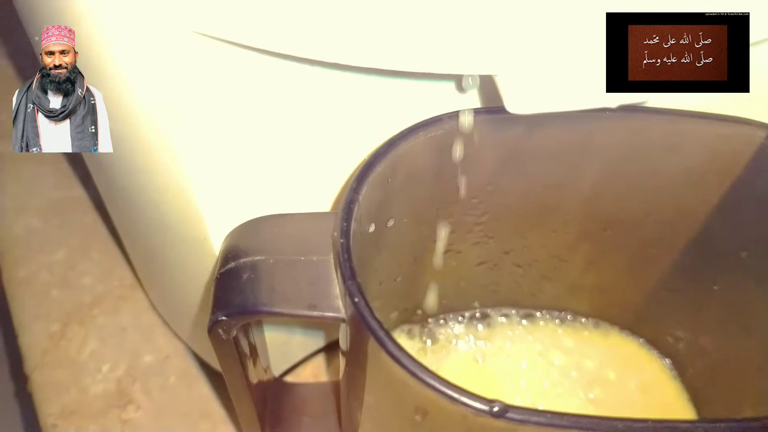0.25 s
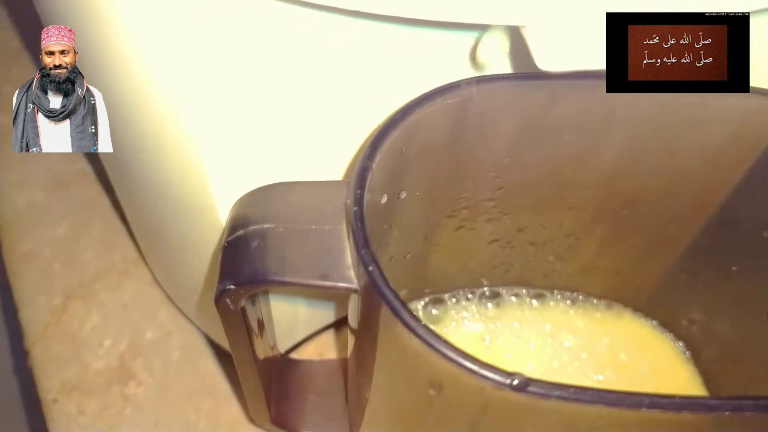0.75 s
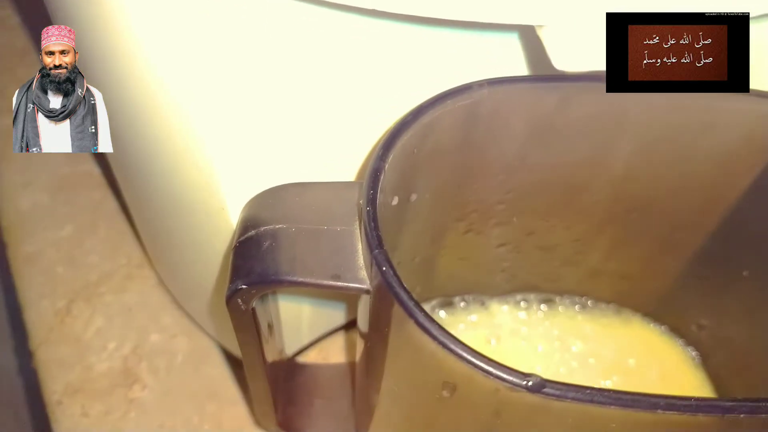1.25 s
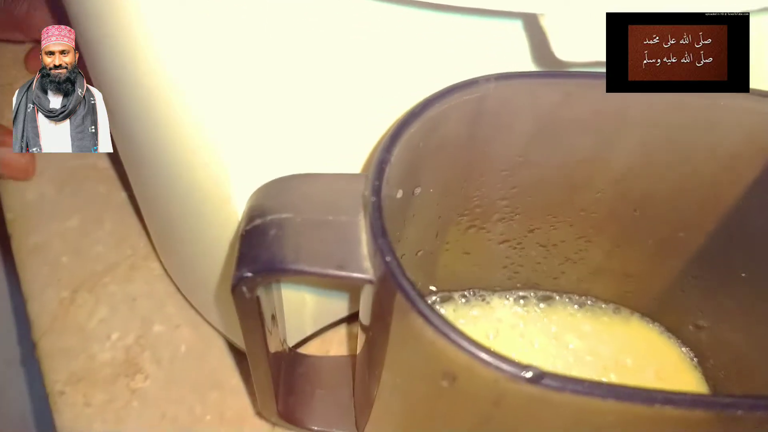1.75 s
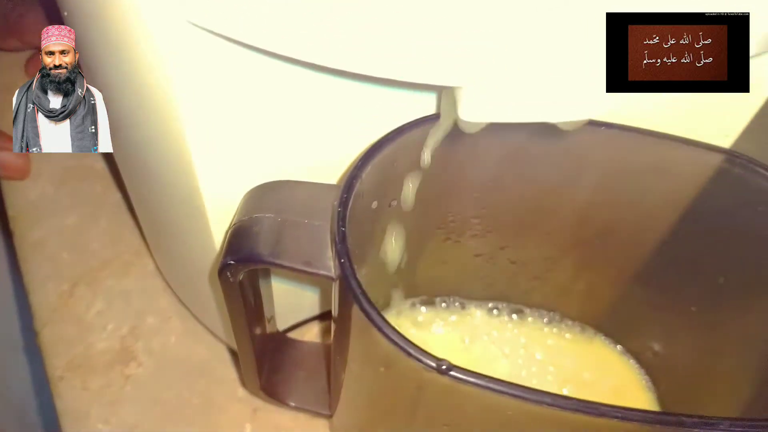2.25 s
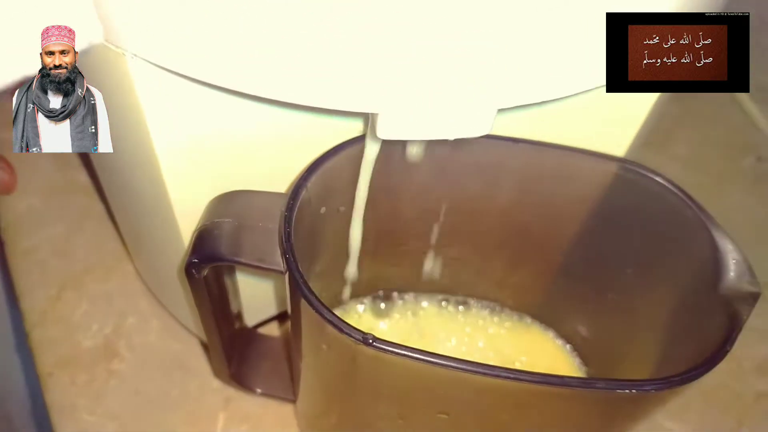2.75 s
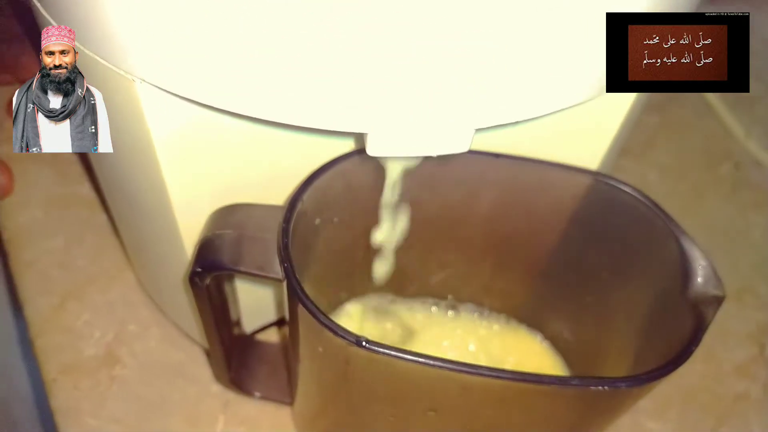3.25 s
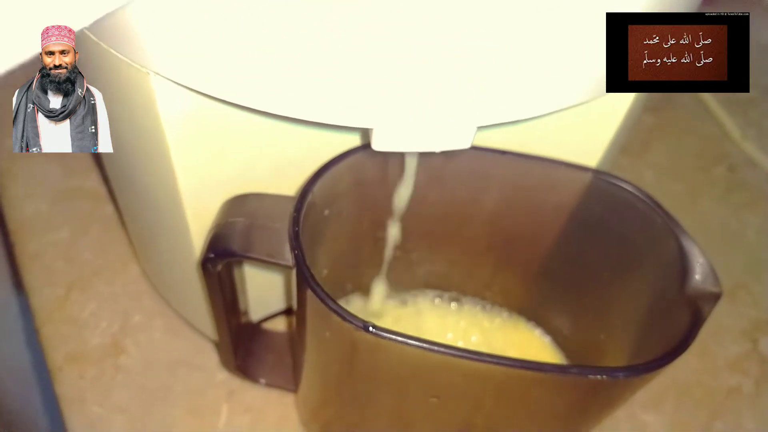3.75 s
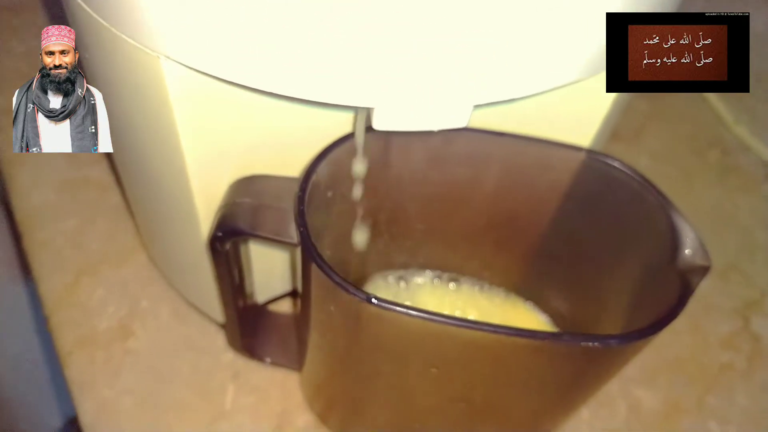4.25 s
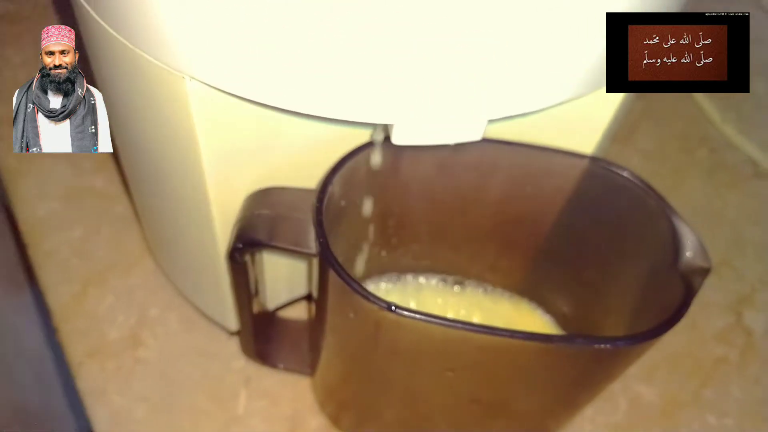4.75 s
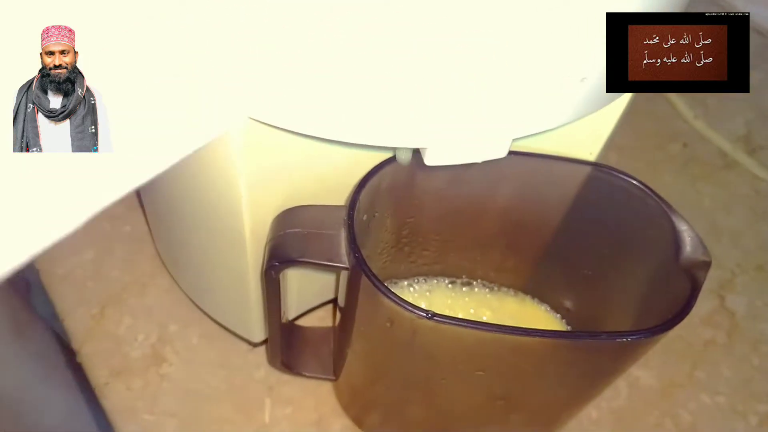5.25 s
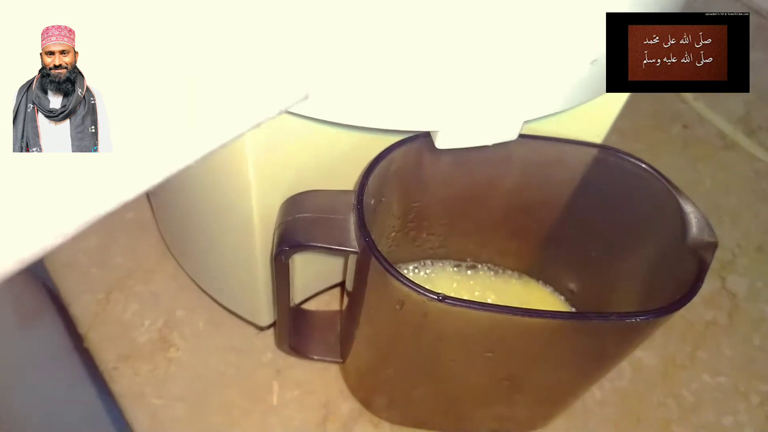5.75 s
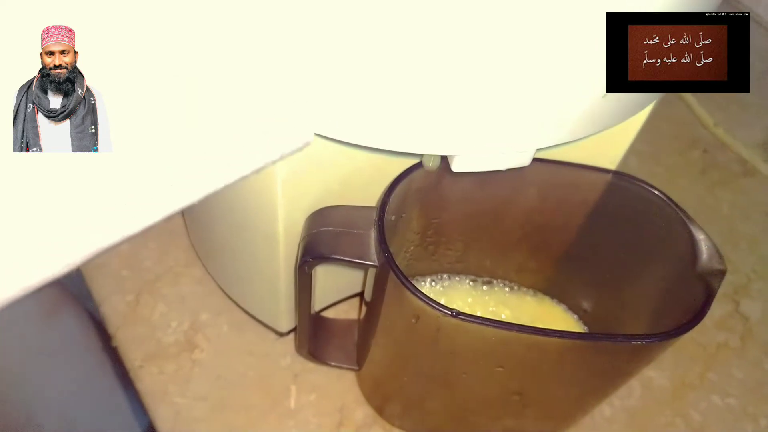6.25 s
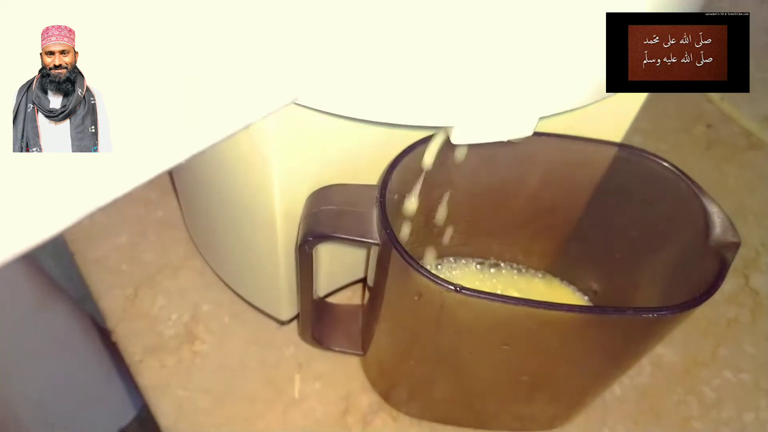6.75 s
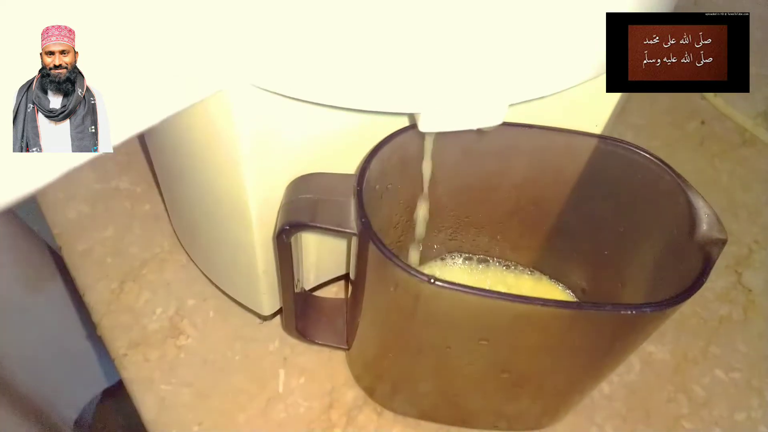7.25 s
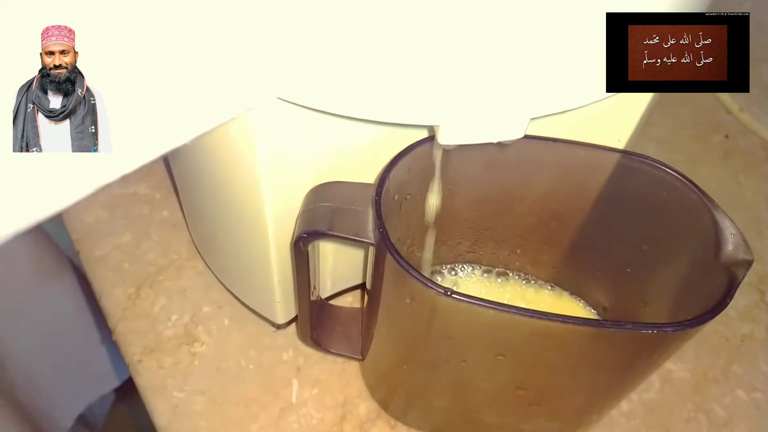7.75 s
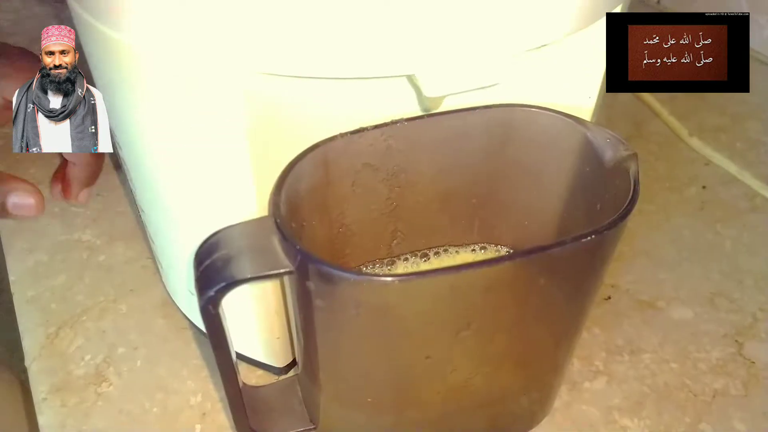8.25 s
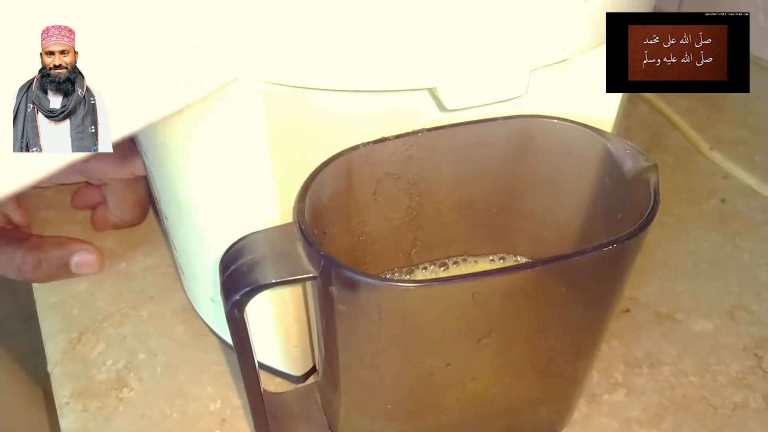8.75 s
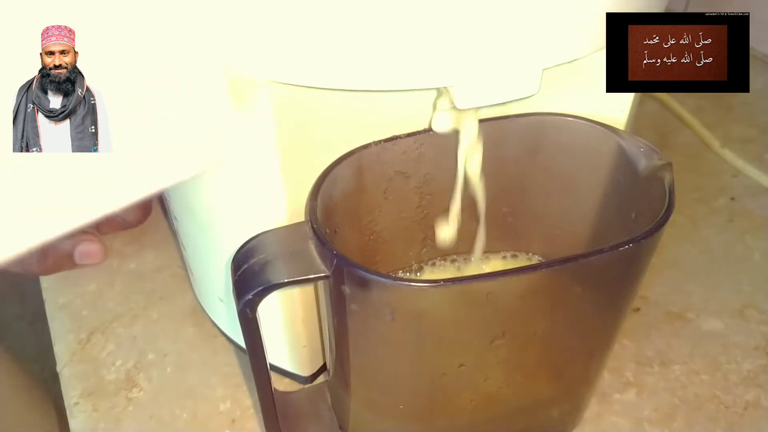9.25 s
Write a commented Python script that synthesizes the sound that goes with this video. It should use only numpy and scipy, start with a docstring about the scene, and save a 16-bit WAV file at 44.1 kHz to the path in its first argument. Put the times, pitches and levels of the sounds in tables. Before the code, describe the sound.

Very close to a juicer on a stone counter, a fast rattling knock and low motor hum slow gradually. A hard plastic clack drops the level, smaller clacks follow, then the motor surges high with loud wet grating and falls. It coasts downward, clacks and quiets again near five seconds, rises, sags, dips once more amid a cluster of clacks, and ends with a rising, harsh scraping surge.

```python
"""Fast knocking under a wet hiss is heard first: the unbalanced basket of a centrifugal juicer strikes its
plastic housing once a turn while fruit hisses on the grater. Motor pushes raise the speed, fruit brakes it,
and between them the basket coasts. Commutator bars whine at multiples of the speed, unbalance hums in the
stone counter, loose panels resonate, the grater scrapes in a broad band near 3 kHz, and pusher, lid and
switch clack as struck plastic. Two close ports."""
import sys
import numpy as np
from scipy import signal
from scipy.fft import rfft, irfft
from scipy.io import wavfile
from scipy.ndimage import uniform_filter1d, map_coordinates

SR = 44100
rng = np.random.default_rng(int(sys.argv[2]) if len(sys.argv) > 2 else 0)


def output_pcm(signal):
    """Save a mono or channel-first signal as 16-bit PCM at the path in sys.argv[1].

    Samples are clipped to [-1, 1] before scaling.
    """
    pcm = np.clip(np.atleast_2d(signal).T, -1, 1) * 32767
    wavfile.write(sys.argv[1], SR, np.round(pcm).astype(np.int16))


N = 419832

# motion of the basket: air drag grows with speed, bearing friction does not
START_TURNS, DRAG_PER_S, FRICTION = 76.3, .23, 6.9  # turns per s, 1 per s, turns per s2
# motor pushes and fruit brakes: (start [s], end [s], speed reached [turns/s], whine while coasting after [dB])
SPEED_CHANGES = [(1.76, 2.3, 130.5, -85), (2.32, 2.69, 74.7, -55), (3.38, 3.5, 80.8, -59),
                 (6.23, 6.71, 91.8, -59), (8.78, 9.13, 98.5, -85), (9.34, 9.6, 117, -85)]
# after a hard clack the turns go unheard for a while: (from [s], until [s])
LULLS = [(1.245, 1.8), (5.12, 6.66), (8.26, 8.86)]
LULL_EDGE_S, LULL_STEADY = .08, .04  # fade beside a lull; share of the rumble added to repeat even within it
# fruit meets the grater: (start [s], full [s], held until [s], gone [s], grating gain [dB], spray gain [dB],
# growth while held [dB]); a start later than full brings the feed in with a step
FEEDS = [(-.1, -0.5, 0.025, 0.42, 2.5, 2, 2.5), (0.83, 0.5, 1.04, 1.3, -1.5, 2.5, -0.5),
         (1.777, 1.46, 1.74, 1.87, 15.5, 0, 1), (1.88, 1.77, 2.27, 3.16, 10, 7, 4),
         (2.3, 2.5, 2.57, 2.9, 12.5, 15, -1), (3.424, 3.5, 3.58, 3.35, 10, 8.5, 3),
         (4.03, 4.06, 4.27, 3.2, -1.5, -6, -3), (4.38, 3.5, 5.5, 7.6, 3, 4, -4),
         (5.33, 5.5, 6.25, 5.95, 12.5, 6.5, -23), (6.34, 6.5, 6.66, 6.73, 9, 10, 7.5),
         (8.115, 8.5, 6.6, 8.6, 10, 14, -5), (8.58, 8.5, 9.3, 10.3, 7.5, 8.5, 7),
         (9.05, 10, 12, 7.8, 16.5, 16.5, 5), (9.443, 8.5, 9.4, 9.7, 21.5, 7.5, -0.5)]
QUICKEST_S = .04  # the grater never empties faster

# the knocking of one turn
# what repeats each turn: (time [s], share of rumble [0-1], share of grating [0-1], treble chatter [dB])
REPEATS = [(0, .82, .5, -62), (.55, .8, .35, -57), (.8, .65, .4, -54), (1.2, .6, .5, -53),
           (1.8, .22, .1, -62), (2.22, .3, .1, -60), (2.32, .55, .15, -60), (2.45, .5, .1, -60),
           (2.55, .18, .1, -62), (2.8, .45, .25, -64), (3.3, .5, .3, -66), (3.45, .35, .1, -66),
           (3.62, .75, .5, -62), (3.9, .72, .4, -60), (4.05, .58, .15, -58), (4.6, .42, .2, -57),
           (4.8, .42, .55, -55), (5.1, .42, .55, -54), (6.7, .35, .1, -68), (7.2, .55, .25, -66),
           (7.8, .68, .35, -61), (8.2, .72, .4, -58), (8.9, .3, .1, -65), (9.52, .4, .1, -65)]
# spectrum of the treble chatter: (frequency [Hz], level per hertz [dB])
CHATTER_SPECTRUM = [(3800, -40), (4700, -3), (5400, 3), (6200, -10), (6800, -9), (7500, 2), (8200, -6),
                    (9500, -25)]
TOP_ORDER, LOW_ORDERS = 165, 18  # highest order of the speed; orders below the second scatter more
SMEAR_LOW, SMEAR_HIGH = .45, .16  # phase scatter in turns: high orders line up into a tick

# rumble and hum: (time [s], housing rumble [dB], counter hum [dB])
LEVELS = [(0, -20, -25), (.42, -24.5, -27), (.7, -22, -29), (.74, -24, -26.5), (1.1, -24, -23.5),
          (1.235, -22.5, -26.5), (1.3, -38.5, -42), (1.5, -39, -40.5), (1.64, -31.5, -32.5),
          (1.75, -40, -32), (1.81, -24.5, -29), (1.9, -17, -26), (2.4, -19.5, -25.5), (2.68, -25, -32.5),
          (2.83, -35, -36.5), (3.1, -31, -30.5), (3.36, -31.5, -27.5), (3.43, -20.5, -25),
          (3.65, -25.5, -23), (4.05, -20.5, -25), (4.45, -24.5, -27.5), (5.11, -29.5, -25.5),
          (5.19, -35, -47), (5.31, -42, -44.5), (5.37, -30.5, -38), (5.47, -24.5, -37), (5.54, -28, -36.5),
          (5.74, -27.5, -33), (5.78, -35.5, -38), (5.87, -31, -35.5), (5.92, -36.5, -46),
          (6.02, -44.5, -43.5), (6.21, -54.5, -45.5), (6.26, -50, -46), (6.285, -36.5, -40),
          (6.34, -31.5, -37.5), (6.7, -24.5, -31.5), (6.9, -22, -25), (7.3, -24, -22), (7.66, -21.5, -28.5),
          (8.1, -24, -23), (8.2, -30.5, -33), (8.3, -31.5, -41), (8.35, -37.5, -46), (8.42, -40, -54),
          (8.47, -34.5, -39.5), (8.85, -23.5, -36), (8.98, -24, -25.5), (9.52, -21.5, -27.5)]
# spectrum of the housing: (frequency [Hz], level per hertz [dB])
HOUSING_SPECTRUM = [(200, -42), (330, -6.5), (500, 0), (720, -3.5), (1000, -7), (1200, -11), (1450, -21),
                    (1680, -8.5), (1950, -21), (2300, -9.5), (2800, -25.5), (4000, -112)]
# tilt of the housing's colour: (time [s], tilt [dB per octave])
BRIGHTNESS = [(0, -1.5), (.35, 0.5), (1.2, -3.5), (1.7, 3.5), (1.85, -4.5), (1.96, 5), (2.4, 6.5),
              (2.75, -0.5), (3.0, -1), (3.4, 0.5), (3.53, 4), (4.0, 0.5), (4.43, -0.5), (4.58, -4),
              (5.1, -2), (5.2, 4), (5.55, 4), (5.8, 0), (6.25, 1), (6.6, 4), (7.3, 2), (7.66, -1),
              (8.2, -2), (8.4, 2), (8.68, -3), (9.05, 3.5), (9.52, 2.5)]
# spectrum of the counter's shudder: (frequency [Hz], level per hertz [dB])
COUNTER_SPECTRUM = [(25, -37), (40, -7), (65, -58), (90, -4.5), (110, -1), (160, 7.5), (220, 6), (300, 0.5),
                    (420, -43.5)]
# how the counter answers a shake: (frequency [Hz], level [dB])
COUNTER_RESPONSE = [(45, -70), (65, -64), (80, -51), (100, -45.5), (120, -43), (140, -27.5), (160, -26),
                    (200, -29.5), (260, -30.5), (400, -29.5)]
# first, second and third order of the speed: level added to the counter's answer [dB]
UNBALANCE_DB = [5.5, 0.5, -3]
# how lopsided the pulp lies in the basket: (time [s], first order [dB], higher orders [dB])
PULP = [(0, 2, 0), (.5, -10, -2.5), (1.2, 5, 2), (1.9, 8, -2.5), (2.3, -0.5, -2), (2.7, 9, -8.5),
        (3.3, 6, -1.5), (3.6, 1, -5), (4.3, 1, -0.5), (5.1, 2, -7), (6.7, 1, -1.5), (7.2, 5.5, -3.5),
        (8.2, -6, -1), (8.9, -15, 2), (9.2, 1.5, -2.5), (9.52, 2.5, 0)]
SHAKE_FOLLOWS = 0.95  # dB of the orders per dB of hum
# loose panels resonate, and the grater scrapes in a broad band near 3 kHz:
# (start [s], end [s], frequency [Hz], width [Hz], level [dB])
RESONANCES = [(0.199, 0.786, 706, 39.4, -24), (1.797, 2.266, 575, 89, -26), (1.94, 2.284, 740, 60, -30),
              (3.415, 3.482, 1680, 90, -28.5), (3.432, 3.567, 1100, 70, -25.5),
              (4.05, 4.453, 1134, 80, -32.5), (4.037, 4.29, 3200, 496, -48), (4.11, 4.286, 1650, 179, -35),
              (8.699, 9.296, 3160, 590, -38.5), (9.019, 9.19, 3130, 600, -29),
              (9.203, 9.52, 3200, 600, -36), (9.341, 9.47, 3080, 700, -28), (4.56, 4.993, 730, 58.7, -32.5),
              (4.6, 5.127, 502, 69, -29.5), (5.451, 5.76, 514, 49.7, -43), (6.622, 6.894, 720, 50, -30.5),
              (7.477, 7.514, 705, 88, -32), (7.545, 8.096, 660, 87.5, -36), (8.996, 9.363, 765, 40.6, -24),
              (9.373, 9.47, 627, 60, -23.5), (9.358, 9.484, 920, 120, -22.5)]

# lines of the whine: (multiple of the speed [1], level [dB])
BAR_LINES = [(36, -6), (60, -15), (72, 0), (84, -14), (96, -15), (108, -19), (120, -17), (144, -17)]
# the whine swells and sinks: (time [s], level [dB])
WHINE_SWELL = [(0, 4), (.3, 3), (.8, 2), (1.0, -3), (1.3, -6), (2.7, 5), (2.95, 2), (3.15, -4), (3.6, 1),
               (3.9, 2), (4.15, -3), (4.5, -2), (4.85, 2), (5.1, 5), (6.9, -7), (7.05, 4), (7.7, 4),
               (8.1, 2)]
# how the housing lets the whine out: (frequency [Hz], gain [dB])
WHINE_BODY = [(1500, -18), (2700, -13), (3300, 8), (3900, 2), (4600, -4), (5600, 2), (6500, -2), (7800, 2),
              (10000, -10)]
# dB; dB per dB of rumble and hum; dB lost per dB of grating
START_WHINE_DB, WHINE_FOLLOWS, WHINE_MASKED = -58, .5, .8

# spectrum of the grating: (frequency [Hz], level per hertz [dB])
GRATER_SPECTRUM = [(800, -19.5), (1450, -4), (1680, -5), (1950, -21), (2300, 0), (2800, -1.5), (3300, -8),
                   (3800, -17), (5000, -48)]
# spectrum of the spray: (frequency [Hz], level per hertz [dB])
SPRAY_SPECTRUM = [(2800, -7), (3800, -14.5), (4500, 2.5), (5400, 2), (6300, -0.5), (7500, -2.5), (9000, -8),
                  (11000, -12.5), (15000, -21)]
# pulp stuck to the grater scrapes once a turn: (time [s], depth of the hiss's throb [0-1])
THROB = [(0, .5), (.6, .4), (.9, .1), (2.0, .25), (3.3, .2), (3.6, .45), (4.0, .3), (4.05, .85),
         (4.28, .85), (4.33, .15), (5.1, .15), (6.75, .35), (7.0, .6), (7.55, .65), (7.75, .3), (8.2, .2),
         (9.52, .15)]
GRATING_DB, SPRAY_DB, HISS_FOLLOWS = -41.5, -49, 0.74  # with rumble and hum at -20 dB; dB per dB of them
TOP_HZ, TOP_DB, TOP_PER_DB = 10200, -5, 0.5  # the hiss above 10.2 kHz is duller when quiet, brighter when loud

# pusher, lid and switch: (time [s], level [dB], treble of the tick against the ring [dB],
# pitch of the lower modes [factor], upper modes [dB], hardness of the first touch [1])
CLACKS = [(1.177, -12, -30, 0.63, -4, 1.2), (1.243, 3, -21.5, 1.09, -4, 2.9),
          (1.249, -13, -16, 1.1, 7, 1.4), (1.265, -24, -25, 0.89, 0, 1.2),
          (1.454, -20.5, -29, 0.69, -4, 2.5), (1.515, -10, -37, 1.33, -3, 1.06),
          (1.527, -19, -30, 1, -8, .5), (1.546, -31, -30, 1, -4, .5), (1.582, -17, -33, 0.77, -10, 1),
          (1.588, -21, -30, .8, -6, .5), (1.598, -12, -20, .8, 2, 1), (1.6035, -11.5, -15, 1.04, -5, 1),
          (1.6095, -9, -18, 1.07, -6, 0.45), (1.617, -21, -20, .8, 2, .6), (1.794, -13, -31, 1.23, 10, 1.8),
          (2.66, -15, 1.5, 1.1, 6, 1), (3.373, -21, -9, 0.79, 5, 0.79), (4.401, -8, -32, 1.3, -1, 1.45),
          (4.42, -6, -32, 1.05, -8, 0.94), (5.1176, 4, -17.5, 0.86, -5, 3.6),
          (5.1215, -7.5, -30, .85, -8, 1.5), (5.13, -14, -28, .85, -6, 1), (5.136, -17, -23, .9, 2, 0.98),
          (5.332, -13, -29, 1.46, 11, 1.3), (5.465, -28, 0, 0.99, 0, 1), (5.495, -25, -4, 1.2, 0, 1),
          (5.528, -23, -2, 1.1, 10, 1.1), (5.561, -29, 0, 1.3, 3, 1), (5.603, -26, -4, 1.2, 2, 0.91),
          (5.828, -13.5, -12, 1.6, 0, 1.31), (5.8735, -8.5, -11, 0.79, 2, 1.2),
          (5.8755, 0, -9.5, 1.08, 8, 2.1), (5.881, -10.5, -21, 1, 4, 1.2), (6.22, -46, -20, 0.92, 2, 1.5),
          (6.643, -8, -11, 0.77, -9, 1.4), (7.506, -4.5, -37, 0.63, -11, 3.8),
          (8.167, -9, -25, 0.88, 7, 1.7), (8.246, -3.5, -15, 0.97, -4, 1.9),
          (8.2495, -4, -24, .85, -3, 1.9), (8.262, -21, -23, .85, -3, 1), (8.2728, -10, -18, 0.9, 7, 1.7),
          (8.2805, -13, -23, 0.92, -3, 1.9), (8.294, -13, -9, 0.75, 7, 1), (8.306, 2, -14, 1.02, 4.5, 2.2),
          (8.3145, -13.5, -18, 0.63, 5, 1), (8.391, -12, -20, 1.15, 6, 0.8),
          (8.454, -25, -17, 1.2, 22, 0.66)]
# modes of the plastic parts: (frequency [Hz], level [dB], 60 dB decay time [s])
PLASTIC_MODES = [(454, -18, 0.027), (600, -9, 0.035), (797, 2, 0.045), (980, 9, 0.032), (1156, 12.5, 0.018),
                 (1380, 3, .01), (1600, 9, 0.011), (1840, -1, .01), (2460, 3.5, 0.023), (2790, -3, 0.02),
                 (2990, -4.5, 0.019), (3170, -0.5, 0.017), (3580, -17, 0.0088)]
UPPER_HZ, TOUCH_S = 2000, 0.000093  # the pitch factor spares modes above this; time scale of the first touch
CONTACT_S, BUZZ_T60_S, SNAP = 0.0011, 0.075, 1.23  # rough contact, decay of the loose buzz, bare-blow gain
DETUNE, UNEVEN_DB = .04, 2  # each blow lands elsewhere: spread of mode pitch (share) and level (dB)

# between the ports: (frequency [Hz], phase by which the right leads [rad])
PORT_LEAD = [(60, 0), (130, -.8), (330, 0.17), (1200, 0.21), (1800, 1.6), (2150, 2.96), (3100, 6),
             (3800, 6.57), (4150, 9.15), (4650, 9.4), (5000, 11.83), (5900, 12.4), (6100, 15), (6700, 15.6),
             (6950, 18.8), (7800, 19.2), (8200, 22.1), (15000, 36)]
# between the ports: (frequency [Hz], likeness [0-1])
PORT_LIKENESS = [(40, 0.067), (130, 0.66), (250, 0.52), (450, 0.97), (1200, 0.96), (1450, 0.56),
                 (1750, 0.83), (2100, 1), (3300, 0.78), (3750, 0.23), (4300, 1), (4900, 0.48), (5400, 1),
                 (6000, 0.13), (6500, 0.76), (6900, 0.2), (7400, 0.28), (8000, 0.33), (15000, 0.24)]
# between the ports: (frequency [Hz], left over right [dB])
PORT_TILT = [(60, 1), (160, 1.5), (500, 0), (1500, 0.2), (2700, -1.5), (5000, 0), (9000, 2.5), (12000, 0.5)]
EDGE_HZ = 15600  # upper band limit


def gain_of(db):
    """Amplitude is ten to the power of a twentieth of the level in dB."""
    return 10 ** (np.asarray(db) / 20)


def evened(x):
    """Division by the root mean square gives unit power."""
    return x / np.sqrt(np.mean(x ** 2) + 1e-20)


def read(points, hz):
    """A spectrum is interpolated linearly over log frequency."""
    f, value = np.transpose(points)
    return np.interp(np.log(hz + 1), np.log(f + 1), value)


def curves(rows):
    """Each column is interpolated linearly over time."""
    s, *columns = np.transpose(rows)
    return [np.interp(np.arange(N) / SR, s, c) for c in columns]


def colour(x, points, lo_hz, hi_hz):
    """Spectral weighting shapes x; by Parseval's theorem the band lo-hi is set to rms 1."""
    hz = np.fft.rfftfreq(N, 1 / SR)
    z = rfft(x) * gain_of(read(points, hz))
    band_power = abs(z[..., (hz > lo_hz) & (hz < hi_hz)]) ** 2
    return irfft(z, N) * N / np.sqrt(2 * band_power.sum(-1, keepdims=True))


def wander(per_s):
    """Slow fluctuation: straight lines join independent normal values, per_s of them a second."""
    knots = rng.standard_normal(N // 500)
    return 1.7 * np.interp(np.arange(N) * per_s / SR, np.arange(N // 500), knots)


def blend(share, repeating, chance):
    """Uncorrelated parts add in power, so each is weighted by the root of its share."""
    share = np.clip(share, 0, 1)
    return np.sqrt(share) * repeating + np.sqrt(1 - share) * chance


def basket():
    """Drag and friction slow the free rotor; pushes and brakes set speed [turns/s] and whine [dB]."""
    t, rest = np.arange(N) / SR, FRICTION / DRAG_PER_S
    speed = (START_TURNS + rest) * np.exp(-DRAG_PER_S * t) - rest
    whine_db = np.full(N, float(START_WHINE_DB))
    for start, end, reached, after_db in SPEED_CHANGES:
        before = speed[round(start * SR)]
        part = np.clip((t - start) / (end - start), 0, 1) * np.pi / 2
        # a push levels off, a brake bites harder
        eased = np.sin(part) if reached > before else 2 * (1 - np.cos(part * 2 / 3))
        changing = before + (reached - before) * eased
        coast = (reached + rest) * np.exp(-DRAG_PER_S * (t - end)) - rest
        speed = np.where(t < start, speed, np.where(t < end, changing, coast))
        whine_db = np.where(t < start, whine_db, np.where(t < end, -90, after_db))
    return speed, uniform_filter1d(whine_db, 3000)


def heard():
    """Audibility of the periodic part: 1 while the turns are heard, 0 in the lulls."""
    t = np.arange(N) / SR
    return np.prod([np.clip(np.maximum(a - t, t - b) / LULL_EDGE_S, 0, 1) for a, b in LULLS], axis=0)


def feeding():
    """Grating and spray gains [dB] rise, hold while growing or waning, and die; the strongest feed rules."""
    t = np.arange(N) / SR
    feeds = []
    for start, full, held, gone, *gains, growth in FEEDS:
        held = max(full, held)
        times = [start, full, held, max(held + QUICKEST_S, gone)]
        feeds.append([np.interp(t, times, [0, db, db + growth, 0]) for db in gains])
    return np.max(feeds, axis=0)


def pattern(turns, speed):
    """A periodic blow is a Fourier series: orders from the 4th up, changing slowly from turn to turn."""
    count, k = int(turns[-1]) + 2, np.arange(513)[:, None]
    chance = rng.standard_normal((2, 513, count))
    waver, drift = uniform_filter1d(chance, size=7, axis=2) * np.sqrt(7)
    smear = np.where(k < LOW_ORDERS, SMEAR_LOW, SMEAR_HIGH)
    phase = smear * rng.standard_normal((513, 1)) + (.04 + .001 * k) * drift
    size_db = 3.6 * waver + 13. * (k % 12 == 0) * (k > 80)  # every 12th high order stands out
    z = gain_of(size_db) * np.exp(2j * np.pi * phase) * (k > 3) * (k <= TOP_ORDER)
    at = np.array([turns % 1 * 1024, turns])  # place within the turn, and which turn
    # the second port has the same orders in other phases
    both = [map_coordinates(irfft(v, axis=0), at, order=1, mode="grid-wrap")
            for v in (z, z * np.exp(1j * k * k))]
    return np.array(both) * np.sqrt(speed)


def hum(turns, speed, level_db, running):
    """Forced vibration: unbalance drives the counter at the first orders; the rest is a dull shudder."""
    pulp_db = curves(PULP)
    follow_db = SHAKE_FOLLOWS * (level_db + 26)
    answer_db = [read(COUNTER_RESPONSE, (k + 1) * speed) + db + pulp_db[int(k > 0)] + follow_db
                 + 2.66 * wander(7.0) for k, db in enumerate(UNBALANCE_DB)]
    sizes = running * gain_of(np.minimum(answer_db, level_db))
    lines = sum(size * np.sqrt(2) * np.exp(2j * np.pi * (k + 1) * turns) for k, size in enumerate(sizes))
    power = gain_of(level_db) ** 2
    rest = np.maximum(power - (sizes ** 2).sum(0), 0.093 * power)
    shudder = np.sqrt(rest) * colour(rng.standard_normal((2, N)), COUNTER_SPECTRUM, 60, 300)
    return np.array([lines.real, lines.imag]) + shudder


def resonances(turns):
    """Resonance: puffs of noise, one a turn, excite a narrow or broad resonance."""
    out = np.zeros((2, N))
    for start, end, hz, width, db in RESONANCES:
        span = slice(round(start * SR), round(end * SR))
        puffs = np.exp(-((turns[span] + .1) % 1) / .3)
        knocks = puffs * (1.5 + rng.standard_normal((2, span.stop - span.start)))
        ring = signal.lfilter(*signal.iirpeak(hz, hz / width, SR), knocks)
        out[:, span] += gain_of(db) * evened(ring) * signal.windows.tukey(ring.shape[1], .4)
    return out


def whine(turns, level_db):
    """Brushes cross the commutator bars at multiples of the speed; lines tremble and throb once a turn."""
    throb = 1 + .7 * np.cos(2 * np.pi * turns)
    lines = 0
    for k, db in BAR_LINES:
        size = gain_of(db + 2.0 * wander(7.0))
        lines = lines + size * np.exp(2j * np.pi * (k * turns + .0024 * k * wander(60.)))
    sound = gain_of(level_db) * 1.8 * throb * np.array([lines.real, lines.imag])
    return irfft(rfft(sound) * gain_of(read(WHINE_BODY, np.fft.rfftfreq(N, 1 / SR))), N)


def scattered(x):
    """Early reflection: a sound, and the same after a short scatter off counter and jug."""
    t = np.arange(2048) / SR
    burst = rng.standard_normal(2048) * gain_of(-60 * t / 0.043)
    return np.array([x, signal.oaconvolve(x, burst / np.linalg.norm(burst))[:N]])


def clacks():
    """Modal impact: a rough contact of a few ms rings the plastic; a treble tick and loose buzz go with it."""
    out, t = np.zeros(N + 6000), np.arange(6000) / SR
    treble = signal.butter(2, 3000, "high", fs=SR, output="sos")
    soft_top = signal.butter(2, 11000, fs=SR, output="sos")
    dull = signal.butter(4, 2600, fs=SR, output="sos")
    tick_slope = gain_of(-9.0 * np.log2(1 + np.fft.rfftfreq(6000, 1 / SR) / 3000))
    buzz = 0.39 * gain_of(-60 * t / BUZZ_T60_S) * np.minimum(t / CONTACT_S, 1)
    press = t / CONTACT_S * np.exp(1 - t / CONTACT_S) + buzz
    touch = t / TOUCH_S * np.exp(1 - t / TOUCH_S)
    for s, db, tick_db, pitch, upper_db, hard in CLACKS:
        noise = rng.standard_normal((3, 6000))
        modes = np.zeros(6000)
        for (hz, d, t60), u, v in zip(PLASTIC_MODES, noise[2], noise[2, ::-1]):
            upper = hz > UPPER_HZ
            mode_hz = hz * (1 if upper else pitch) * (1 + DETUNE * v)
            decay = gain_of(d + UNEVEN_DB * u + upper_db * upper - 60 * t / t60)
            modes += decay * np.sin(2 * np.pi * mode_hz * t)
        blow = press * noise[0] + hard * touch
        ring = signal.oaconvolve(blow, modes)[:6000]
        bare_blow = signal.sosfilt(dull, blow) / (1 + hard)  # broad and short
        ring = ring / abs(ring).max() + SNAP * bare_blow
        tick = signal.sosfilt(soft_top, signal.sosfilt(treble, press * noise[1]))
        tick = irfft(rfft(tick) * tick_slope)
        at = round(s * SR)
        out[at:at + 6000] -= gain_of(db) * (ring / abs(ring).max() + 2.0 * gain_of(tick_db) * tick)
    # the clacks carry no bass below about 250 Hz
    return signal.sosfilt(signal.butter(2, 250, "high", fs=SR, output="sos"), out[:N])


def grating(turns, clatter, share, grating_db, spray_db, throbbing):
    """Modulated noise: pulp on the teeth flickers and scrapes once a turn, with flecks thrown at the wall."""
    flecks = (rng.random(N) < 250. / SR) * gain_of(4.0 * np.minimum(rng.exponential(1, N), 4))
    puffs = signal.lfilter([1], [1, -.985], flecks)
    scrape = throbbing * np.cos(2 * np.pi * (turns - .05))
    flicker = (1 + 0.26 * evened(puffs)) * gain_of(0.63 * wander(13.0))
    hiss = flicker * rng.standard_normal((2, N))
    spray = colour((1 + .2 * scrape) * hiss, SPRAY_SPECTRUM, 4460, 15000)
    top_filter = signal.firwin(63, TOP_HZ, pass_zero=False, fs=SR)[None]
    top = signal.oaconvolve(spray, top_filter, "same")
    spray = spray + (gain_of(TOP_DB + TOP_PER_DB * (spray_db - SPRAY_DB)) - 1) * top
    repeating = colour(clatter, GRATER_SPECTRUM, 1780, 5500)
    chance = colour((1 + scrape) * hiss, GRATER_SPECTRUM, 2380, 5500)
    return gain_of(grating_db) * blend(share, repeating, chance) + gain_of(spray_db) * spray


def rumble(turns, clatter, level_db, bright_db, share):
    """Periodic impact: the basket knocks the housing each turn, with a rattle that swells once a turn."""
    swell = 1.6 + np.exp(-((turns + 0.11) % 1) / 0.38)
    rattle = swell * gain_of(1.4 * wander(25.)) * rng.standard_normal((2, N))
    repeating = colour(clatter, HOUSING_SPECTRUM, 350, 1300)
    z = rfft(blend(share, repeating, colour(rattle, HOUSING_SPECTRUM, 350, 1300)))
    # the low and the high panels of the housing trade places
    octaves = np.clip(np.log2(np.fft.rfftfreq(N, 1 / SR) / 700 + 1e-3), -1, 1)
    low, high = irfft(z * (1 - octaves) / 2, N), irfft(z * (1 + octaves) / 2, N)
    return gain_of(level_db) * (low / gain_of(bright_db) + high * gain_of(bright_db))


def ports(direct, other):
    """Partial coherence: the right port hears the left's sound phase-shifted, plus a share come another way."""
    hz = np.fft.rfftfreq(N, 1 / SR)
    same = np.clip(read(PORT_LIKENESS, hz), 0, 1)
    f, lead = np.transpose(PORT_LEAD)
    shift = np.exp(1j * np.interp(hz, f, lead))
    right = same * shift * rfft(direct) + np.sqrt(1 - same ** 2) * rfft(other)
    tilt = gain_of(read(PORT_TILT, hz) / 2)
    return irfft(np.array([rfft(direct) * tilt, right / tilt]), N)


def scene():
    """Superposition: the sounds of the turning basket and the clacks add up and reach the two ports."""
    speed, whine_db = basket()
    turns, running = np.cumsum(speed) / SR, heard()
    rumble_db, hum_db = curves(LEVELS)
    grate_db, fling_db = feeding()
    over_db = 10 * np.log10(gain_of(rumble_db) ** 2 + gain_of(hum_db) ** 2) + 20  # rumble and hum above -20 dB
    knocking, rasping, chatter_db = curves(REPEATS)
    clatter = pattern(turns, speed)
    bright_db = curves(BRIGHTNESS)[0] + 0.36 * wander(6.0)

    motor = hum(turns, speed, hum_db + 1.53 * wander(9.0), running)
    whine_db = whine_db + curves(WHINE_SWELL)[0] + WHINE_FOLLOWS * over_db - WHINE_MASKED * grate_db
    motor += running * whine(turns, whine_db)
    motor += running * gain_of(chatter_db) * colour(clatter, CHATTER_SPECTRUM, 4460, 9000)
    motor += rumble(turns, clatter, rumble_db, bright_db, LULL_STEADY + running * knocking)

    grating_db = GRATING_DB + HISS_FOLLOWS * over_db + grate_db
    spray_db = SPRAY_DB + HISS_FOLLOWS * over_db + fling_db
    throbbing = running * curves(THROB)[0]
    hiss = grating(turns, clatter, running * rasping, grating_db, spray_db, throbbing)
    return ports(*(motor + resonances(turns) + hiss + scattered(clacks())))


def record(dry):
    """Transduction: the microphone drops the lowest bass, peaks clip; then the band limit."""
    thin = signal.sosfilt(signal.butter(2, 55, "high", fs=SR, output="sos"), dry)
    band_limit = signal.firwin(255, EDGE_HZ, window=("kaiser", 9), fs=SR)[None]
    return signal.oaconvolve(np.clip(thin, -1, 1), band_limit, "same")


dry = scene()
out = record(dry)
output_pcm(out)
```